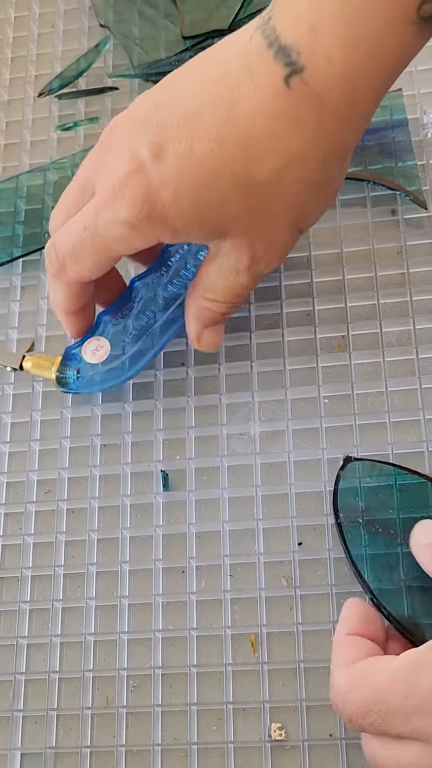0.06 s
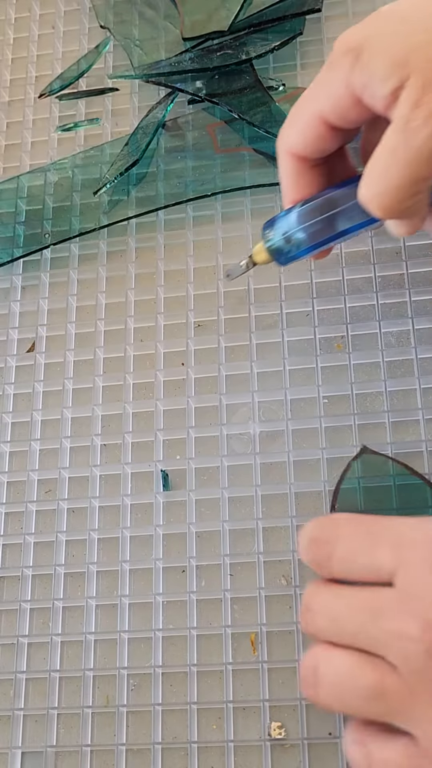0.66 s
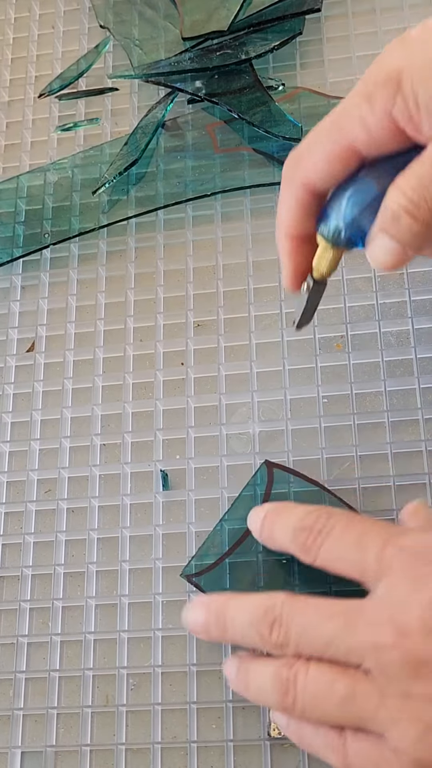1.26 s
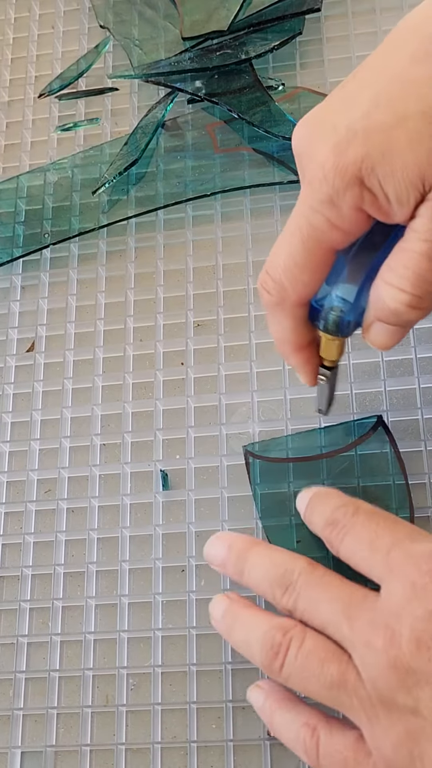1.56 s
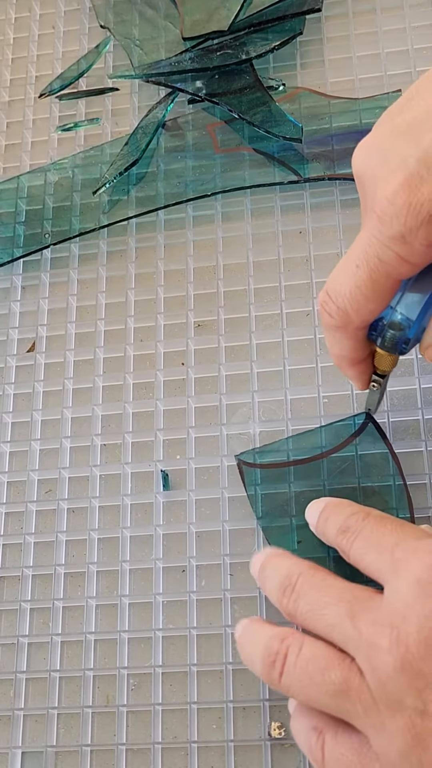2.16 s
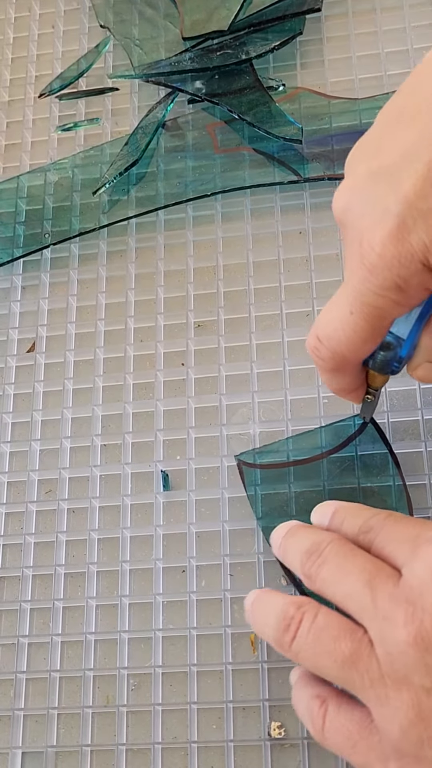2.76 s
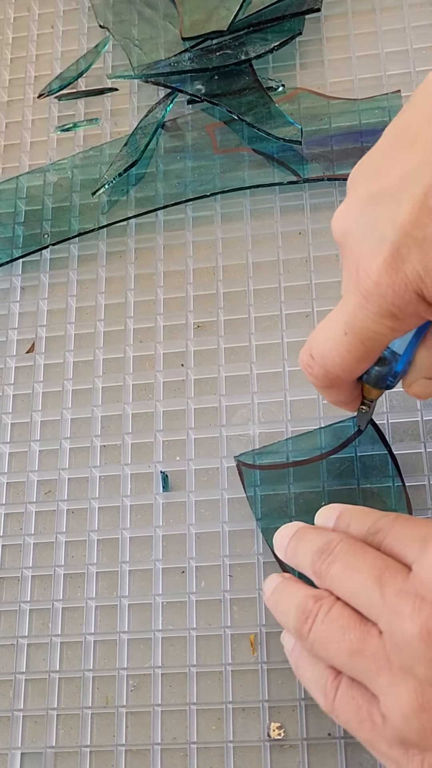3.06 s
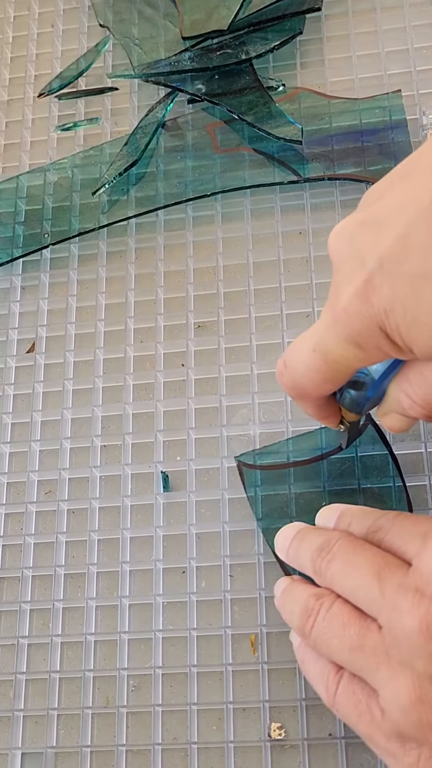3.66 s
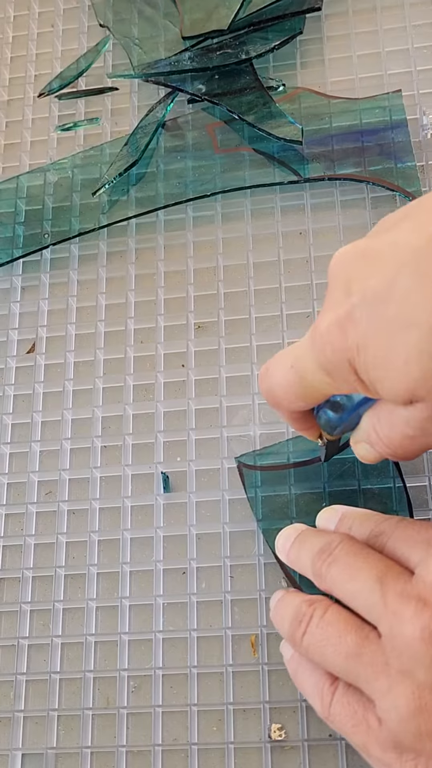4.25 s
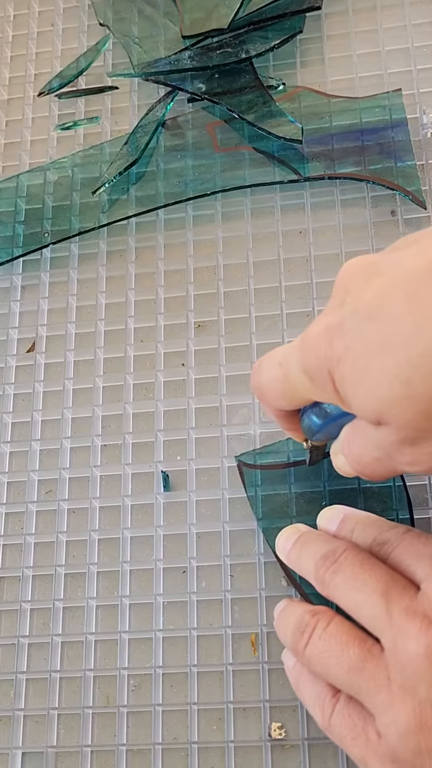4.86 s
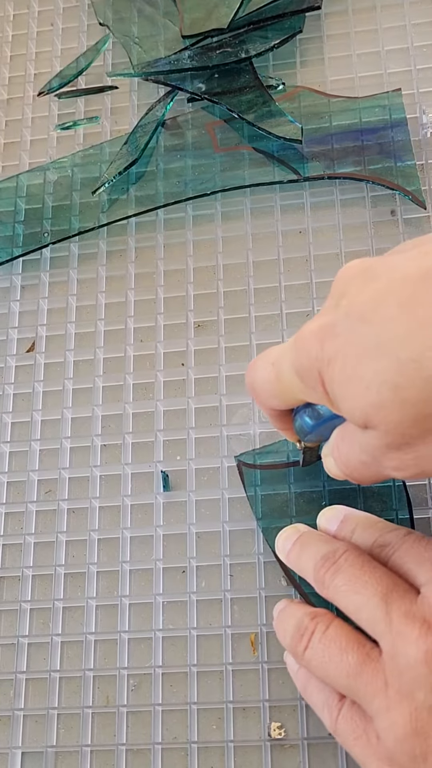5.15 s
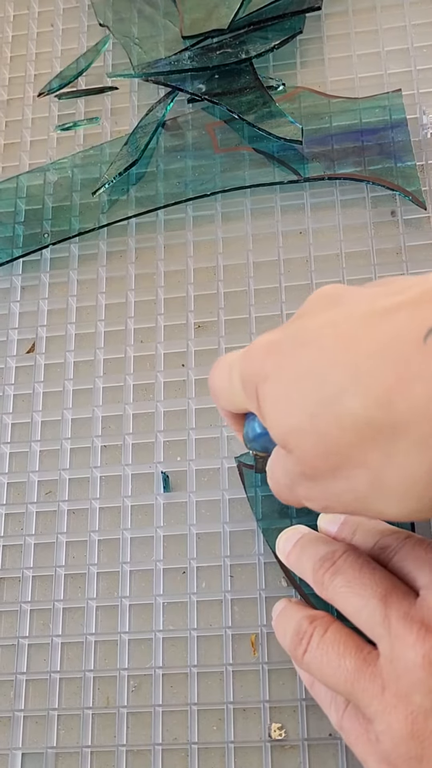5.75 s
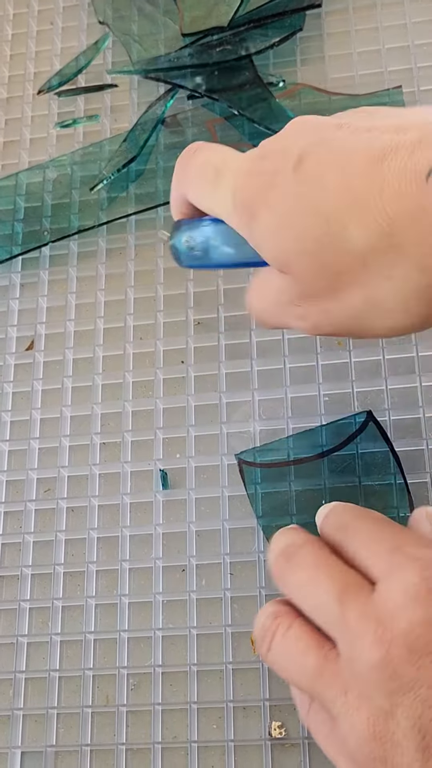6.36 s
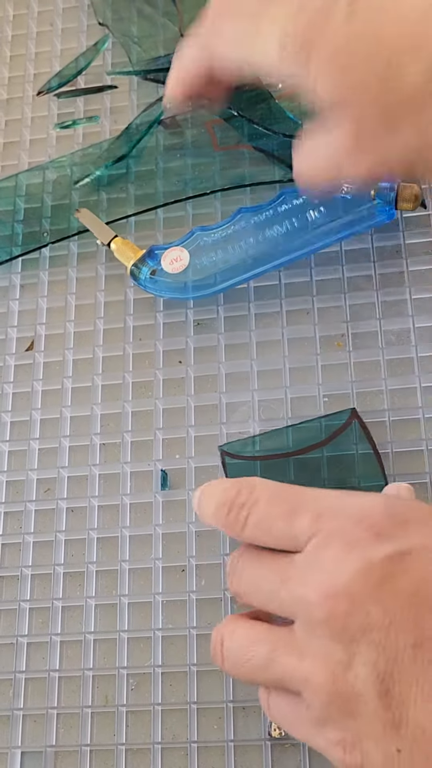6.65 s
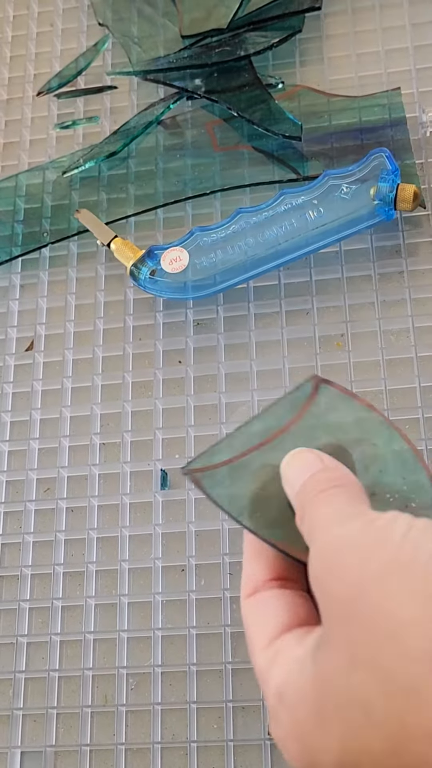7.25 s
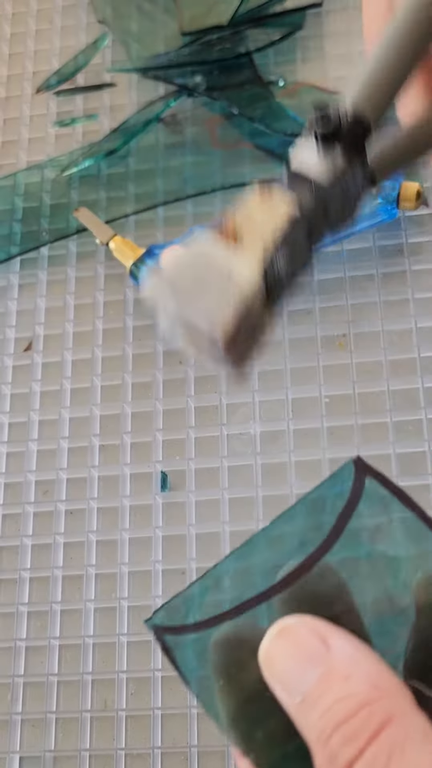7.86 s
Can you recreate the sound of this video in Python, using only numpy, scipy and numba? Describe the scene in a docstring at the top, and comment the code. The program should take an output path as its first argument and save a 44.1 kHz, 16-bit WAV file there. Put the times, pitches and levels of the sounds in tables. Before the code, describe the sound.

A soft rub and a sharp, clinking knock open the sound as a glass cutter is picked up. From about 0.6 to 1.5 seconds a piece of glass slides over a plastic grid with light, hollow clacks. The cutter wheel taps the glass at 2.4 seconds. From 3 seconds it scores the pane in uneven, gritty, high crackling bursts that grow stronger, pause around 4.5 seconds and resume just after 5. At about 6.1 seconds the wheel runs off the edge with a sharp click and a low thump. At 6.5 seconds the cutter drops on the plastic with the loudest clack, bouncing while its loose metal head rattles briefly. Softer knocks and rubbing follow from 7 to 7.5 seconds as the glass is lifted. Everything is close, in a small room with a faint electrical hum and occasional, very faint distant birds.

```python
"""A soft rub and a sharp, clinking knock sound over faint mains hum: a wheel cutter is picked up.
Sheet glass slides into place on a plastic grid on a bench, exciting its resonances; far birds call.
The wheel scores a curve by stick-slip motion, each slip a tiny fracture that rings the pane, then runs
off the edge and strikes the grid. The cutter is dropped, its loose head rattles, and the glass is
lifted. Early reflections and a short reverberation place it all in a small room."""
import sys
import numpy as np
from scipy import signal
from scipy.fft import rfft, irfft, next_fast_len
from scipy.io import wavfile
from scipy.ndimage import uniform_filter1d
from numba import njit

SR = 44100
rng = np.random.default_rng(int(sys.argv[2]) if len(sys.argv) > 2 else 0)


def unload_wav(signal):
    """Save mono or channel-first audio to the path in sys.argv[1] as 16-bit WAV at rate SR, clipped to [-1, 1]."""
    wavfile.write(
        sys.argv[1],
        SR,
        np.round(np.clip(np.atleast_2d(signal).T, -1, 1) * 32767).astype(np.int16),
    )


N = 357196
TIME = np.arange(N) / SR
PADDED = next_fast_len(N + SR, real=True)
FREQ = np.maximum(np.fft.rfftfreq(PADDED, 1 / SR), 1)


def undb(db):
    """Amplitude ratio of a level; the levels in the tables are relative."""
    return 10 ** (np.asarray(db) / 20)

def unit(x):
    """Normalisation to rms 1."""
    return x / np.sqrt(np.mean(x ** 2))

def curves(table):
    """Linear interpolation of each column over time."""
    s, *columns = np.transpose(table)
    return [np.interp(TIME, s, c) for c in columns]

def swell(s, rise_s, fall_s):
    """Asymmetric Gaussian envelope, peaking at time s."""
    return np.exp(-((TIME - s) / np.where(TIME < s, rise_s, fall_s)) ** 2)

def walk(rate):
    """Slow random modulation, turning rate times a second."""
    k = int(SR / rate)
    return 0.69 * uniform_filter1d(np.repeat(rng.standard_normal(N // k + 1), k), k)[:N]

def add(track, s, sound):
    """Superposition of a sound on a track at time s."""
    i = max(int(s * SR), 0)
    track[..., i:i + sound.shape[-1]] += sound[..., :N - i]

def pan(db):
    """Channel gains for a level difference, left minus right."""
    return undb(np.array([db, -db]).reshape(2, -1) / 2)

def contour(points, freq=FREQ):
    """Spectral envelope through points (f/Hz, level/dB)."""
    hz, db = np.transpose(points)
    return undb(np.interp(np.log(freq), np.log(hz), db))

def causal(gain):
    """Minimum-phase response: nothing sounds ahead of its excitation."""
    cepstrum = irfft(np.log(gain), PADDED)
    cepstrum[1:PADDED // 2] *= 2
    cepstrum[PADDED // 2 + 1:] = 0
    return np.exp(rfft(cepstrum))

def modes(table):
    """Modal superposition: the summed response of damped resonators."""
    return sum(undb(db) / (1 + 1j * (FREQ ** 2 - hz ** 2) / (FREQ * width)) for hz, width, db in table)

def through(x, response):
    """Linear filtering by multiplication of spectra."""
    return irfft(rfft(x, PADDED) * response, PADDED)[..., :N]

def ring(x, response):
    """Forced response, scaled to conserve the power of a white input."""
    return through(x, response / np.sqrt(np.mean(abs(response) ** 2)))

def noise(points, size=N, apart_hz=1300):
    """Coloured stereo noise whose coherence falls with frequency."""
    count = next_fast_len(size, real=True)
    freq = np.maximum(np.fft.rfftfreq(count, 1 / SR), 1)
    mid, side = rfft(rng.standard_normal((2, count)))
    side = side * np.clip(freq / apart_hz, .18, 1)
    spectrum = np.array([mid + side, mid - side]) * contour(points, freq)
    return unit(irfft(spectrum, count)[:, :size])

def radiate(x, turn_hz=330, spread=2.66, alike_hz=900):
    """Plate radiation: each frequency reaches left and right with its own phase difference."""
    knots = np.arange(0, SR / 2, turn_hz)
    phase = np.interp(FREQ, knots, spread * rng.standard_normal(len(knots))) * FREQ / (FREQ + alike_hz)
    return through(x, np.exp(.5j * np.array([phase, -phase])))

def bursts(table, grain_db, sag, release_s=.001, apart=.55):
    """Impulsive excitation: each row is a dense run of uneven micro-impacts that sags, then dies."""
    track, t = np.zeros((2, N)), np.arange(SR // 25) / SR
    for s, db, length in table:
        sizes = undb(grain_db * rng.standard_normal(len(t)))
        sides = 1 + apart * rng.standard_normal((2, len(t)))
        envelope = np.exp(-sag * t / length - np.maximum(t - length, 0) / release_s)
        burst = sides * rng.choice([-1, 1], len(t)) * sizes * envelope
        add(track, s, undb(db) * burst * np.sqrt(2 * length * SR / np.sum(burst ** 2)))
    return radiate(track)

def reverb(x, colour, t60_low, t60_high, delay_s):
    """Diffuse reverberation: echoes decay exponentially, the treble absorbed first."""
    t = np.arange(SR) / SR
    tail = noise(colour, size=len(t))
    low = signal.sosfilt(signal.butter(2, 2500, fs=SR, output="sos"), tail)
    high = signal.sosfilt(signal.butter(2, 2500, "high", fs=SR, output="sos"), tail)
    echo = (low * 1000 ** (-t / t60_low) - high * 1000 ** (-t / t60_high)) * (t > delay_s)
    return signal.fftconvolve(x, echo / np.sqrt(np.sum(echo ** 2) / 2), axes=1)[:, :N]


# spectrum of the room air: f/Hz, level/dB
AIR_SPECTRUM = [(20, -32), (50, -1), (90, -2.5), (140, -14), (220, -13), (400, -12.5), (650, -18),
                (1200, -25.5), (2200, -32.5), (3600, -36.5), (5000, -49), (7600, -40.5), (8800, -67.5),
                (16000, -63)]
# partials of the mains hum: f/Hz, level/dB
HUM_PARTIALS = [(58, -60.5), (118.6, -54), (237.5, -69.5), (1233, -73)]

def air_and_hum(air_db=-51, waver_db=2):
    """A line spectrum over a continuous one: mains hum and room air, both wavering slightly."""
    hum = sum(np.sqrt(2) * undb(db + 2 * walk(6.8)) * np.sin(2 * np.pi * hz * TIME + .5 * walk(3.6))
              for hz, db in HUM_PARTIALS)
    return noise(AIR_SPECTRUM) * undb(air_db + waver_db * walk(22)) + hum


# load of the leaning hand on the bench: t/s, level/dB
HAND_LOAD = [(0, -69), (2.9, -60.5), (3.4, -61.5), (4.2, -49.5), (4.9, -59.5), (5.5, -40), (5.8, -55.5),
             (6.4, -53.5), (7.12, -39.5), (7.4, -53.5), (8.1, -52.5)]

def bench_rumble(boom_s=6.085, boom_db=-23.5):
    """Forced vibration: the bench rumbles under the hand and booms as the wheel leaves the glass."""
    rumble = noise([(25, -15.5), (50, -3), (120, 0), (170, -4), (280, -15), (900, -39.5), (4000, -85.5)])
    boom = undb(boom_db) * swell(boom_s, rise_s=.014, fall_s=.05)
    return rumble * (undb(curves(HAND_LOAD)[0]) + boom)


# modes of the grid and bench: f/Hz, bandwidth/Hz, level/dB
GRID_MODES = [(144, 19, 1.5), (182, 5.9, -0.5), (260, 13, -15.5), (292.3, 7.2, 1.5), (432.4, 7.8, 1.5),
              (468, 7, -5), (630, 61, 4), (835, 22, -1.5), (890, 42, -4), (940, 16, -1.5), (1120, 33, -1),
              (1335, 29, -8), (2410, 58, -2.5)]
# modes of the cutter in the fingers: f/Hz, bandwidth/Hz, level/dB
CUTTER_MODES = [(4750, 74, 6.5), (6260, 120, 9), (8600, 42, 11), (10680, 43, -1), (11500, 70, -7.5),
                (13100, 70, -4), (13780, 80, -5), (14280, 90, -5.5)]
# glass and fingers sliding on the grid: peak t/s, rise/s, fall/s, rub level/dB, hiss level/dB
GRID_SLIDES = [(.08, 0.18, 0.18, -52, -64.5), (0.681, 0.098, 0.12, -53, -62.5),
               (.89, .11, 0.088, -41.5, -48.5), (1.45, 0.11, 0.064, -47.5, -48.5),
               (2.15, 0.021, 0.025, -52, -56.5), (2.7, 0.024, 0.053, -53.5, -65),
               (6.72, .1, 0.29, -47, -68), (7.2, 0.18, 0.32, -58, -66), (7.53, 0.053, 0.083, -54, -53.5)]

def sliding(catch_db=2.5, grit_db=3):
    """Sliding friction: noise coloured by resonances flutters as the glass catches on the ribs."""
    rub_gain, hiss_gain = sum(undb([[rub_db], [hiss_db]]) * swell(s, rise, fall)
                              for s, rise, fall, rub_db, hiss_db in GRID_SLIDES)
    rub = noise([(60, -13), (170, -2), (400, 6.5), (800, -7), (1800, -11.5), (3500, -25.5), (8000, -50)])
    rub = unit(through(rub, 1 + modes(GRID_MODES)))
    hiss = noise([(800, -33.5), (2800, 3.5), (5000, -.5), (6400, -1.5), (8500, -6.5),
                  (11000, -13.5), (14000, -11.5), (16000, -14.5)])
    hiss = unit(through(hiss, 1 + modes(CUTTER_MODES)))
    catch, grit = undb(catch_db * walk(70)), undb(grit_db * walk(600))
    return catch * (rub * rub_gain + hiss * hiss_gain * grit)

def rib_bumps(gap_s=.06, t60_s=.06, scatter_db=2):
    """Roughness excitation: glass bumps over the ribs, hardest where fastest; gives rows of impacts."""
    rows = []
    for s, rise, fall, rub_db, _ in GRID_SLIDES:
        chance = zip(rng.random(size=16), rng.standard_normal(size=16))
        for rib, (late, strength) in zip(np.arange(-rise, fall, gap_s), chance):
            offset = rib + late * gap_s
            drop_db = 20 / np.log(10) * (offset / (rise if offset < 0 else fall)) ** 2
            db = rub_db + scatter_db * strength - drop_db
            if s + offset > 0:
                rows.append((s + offset, db + .5, db - 4, db - 17.5, t60_s, 0))
    return rows


# cutter and glass hitting the grid: t/s, thud level/dB, clack level/dB, tick level/dB, T60/s, pan/dB
IMPACTS = [(.028, -41, -42, -58.5, 0.029, -0.5), (0.1513, -18, -15, -20, .019, -3),
           (.615, -47, -40, -51, 0.12, 0), (.76, -54, -37.5, -62, 0.075, 0),
           (0.7992, -39.5, -33.5, -47, 0.14, .5), (.849, -33.5, -30, -36, 0.072, 0.5),
           (.955, -37.5, -51, -67, 0.14, -2), (1.025, -39.5, -41, -56, 0.055, 2),
           (1.291, -35.5, -39, -62, 0.069, 0), (1.455, -56, -41.5, -50, 0.059, -3),
           (2.086, -50, -58.5, -75, 0.023, 1), (2.378, -40, -39, -41, 0.018, 2.5),
           (2.724, -38, -38.5, -61, 0.02, 1.5), (6.066, -24.5, -16.5, -18.5, 0.077, -2),
           (6.415, -68.5, -60, -50, 0.022, 1), (6.5424, -18, -15.5, -25.5, 0.043, -1),
           (6.995, -32, -36.5, -44, 0.07, -2), (7.074, -35.5, -65, -57, 0.029, 1),
           (7.134, -31, -39, -41.5, 0.12, 1), (7.31, -52.5, -62.5, -49, 0.26, -3)]
# spectrum of an impact: f/Hz, level/dB
IMPACT_SPECTRUM = [(35, 4), (70, 7), (130, 1.5), (400, 2), (650, -1.5), (1200, 0), (1800, -2.5),
                   (2500, -4.5), (4500, -3), (7500, -5), (9500, -18), (11500, -27.5), (13500, -23),
                   (16000, -29)]

def knocks(gain_db=-1, thud_hz=480, tick_hz=3100, thud_stretch=1.4):
    """Free decay after impact: the bench thuds, the plastic clacks and ticks, the grid rings briefly."""
    track, t = np.zeros((2, N)), np.arange(SR // 4) / SR
    edges = [([105, thud_hz], "band"), ([thud_hz, tick_hz], "band"), (tick_hz, "high")]
    low, mid, high = [signal.butter(3, edge, kind, fs=SR, output="sos") for edge, kind in edges]
    for s, thud_db, clack_db, tick_db, t60, pan_db in IMPACTS + rebounds() + rib_bumps():
        dense_modes = noise(IMPACT_SPECTRUM, size=len(t))
        for band, db, decay_s, side in [(low, thud_db, t60 * thud_stretch, 0),
                                        (mid, clack_db, t60, pan_db), (high, tick_db, t60, pan_db)]:
            part = signal.sosfilt(band, dense_modes * 1000 ** (-t / decay_s))
            add(track, s, pan(side) * undb(db) * part / np.std(part[:, :SR // 100]))
    return undb(gain_db) * through(track, 1 + modes(GRID_MODES))


# the cutter bouncing after a hard knock:
# t/s, first flight/s, duration/s, thud level/dB, clack level/dB, tick level/dB, fade/(dB/s), T60/s
CUTTER_BOUNCES = [(0.149, .031, .048, -29.5, -23, -23.5, 89.5, 0.064),
                  (6.065, .015, .034, -22.5, -20.5, -20.5, 201.5, 0.057),
                  (6.5421, .035, .125, -17.5, -15, -14.5, 111.5, .075)]

def rebounds(restitution=.87, far_share=.42, far_db=-2.5, far_pan_db=5.5):
    """Inelastic collision: the cutter rocks end to end in shrinking hops; gives rows of impacts."""
    rows = []
    for start, flight, length, thud, clack, tick, fade, t60 in CUTTER_BOUNCES:
        hop = 0
        for _ in range(8):
            far_end, near_end = (hop + far_share * flight, far_db, far_pan_db), (hop + flight, 0, 0)
            for late, end_db, side in (far_end, near_end):
                db = end_db - fade * late
                if late < length:
                    rows.append((start + late, thud + db, clack + db, tick + db, t60, side))
            hop, flight = hop + flight, flight * restitution
    return rows


# contacts of the cutter as it is picked up: t/s, level/dB, duration/s
PICKUP_CONTACTS = [(.1525, -21, 0.0018), (.183, -27.5, 0.0024), (.853, -41.5, 0.00866)]

def cutter_clinks():
    """Modal ringing: brief contacts excite the cutter held in the fingers."""
    return ring(bursts(PICKUP_CONTACTS, grain_db=9, sag=.32), modes(CUTTER_MODES))


# glass or handle landing flat on the grid: t/s, level/dB, duration/s
FLAT_CONTACTS = [(.736, -36.5, 0.0037), (.761, -40, .011), (.8, -37, .0031), (.85, -27, 0.0055),
                 (1.291, -45, 0.0044), (6.5435, -9.5, .0014), (6.9955, -22, 0.0021)]
# air modes of the covered grid cells: f/Hz, bandwidth/Hz, level/dB
CELL_MODES = [(1140, 150, 9), (1440, 170, 7.5), (1760, 130, 0.5), (2400, 200, -2)]

def hollow_slaps(pan_db=3):
    """Cavity resonance: a flat face claps on the air cells of the grid."""
    return pan(pan_db) * ring(bursts(FLAT_CONTACTS, grain_db=-.5, sag=.82), modes(CELL_MODES))


# notes of each song: t/s within it, duration/s, start f/Hz, end f/Hz, level/dB, relative warble
HOARSE_NOTES = [(0, .08, 5460, 4420, -5, 0.087), (0.028, .12, 3013, 2670, 0.5, 0.09),
                (0.087, .18, 3230, 2940, -4.5, .08), (.172, .16, 2405, 2095, -4.5, 0.081)]
THIN_NOTES = [(0, .053, 6950, 5830, -1, .036), (.07, .045, 6580, 6350, -9, .014),
              (.15, .03, 4420, 4350, -1.5, .008), (.21, .065, 5930, 5340, -14.5, .045)]
# entries of each song: t/s, level/dB
HOARSE_ENTRIES = [(.866, -53.5), (1.216, -55.5), (1.592, -55)]
THIN_ENTRIES = [(3.068, -51.5), (5.765, -50.5), (7.446, -52)]

def birds(direct_db=-14):
    """Frequency modulation: two far birds whistle falling, warbling notes, heard mostly as echoes."""
    song = np.zeros((2, N))
    for entries, notes in [(HOARSE_ENTRIES, HOARSE_NOTES), (THIN_ENTRIES, THIN_NOTES)]:
        for s, song_db in entries:
            for late, length, start_hz, end_hz, db, warble in notes:
                u = np.linspace(0, 1, int(length * SR))
                hz = (start_hz + (end_hz - start_hz) * u) * (1 + warble * walk(350)[:len(u)])
                envelope = undb(song_db + db) * np.sqrt(8 * u * (1 - u))
                add(song, s + late, envelope * np.sin(2 * np.pi * np.cumsum(hz) / SR))
    echoes = reverb(song, [(100, .035), (8000, .011)], t60_low=.77, t60_high=.33, delay_s=.0078)
    return undb(direct_db) * song + echoes


# the wheel set down on the glass: t/s, level/dB, duration/s
WHEEL_CONTACT = [(2.378, -24, .0016)]
# modes of the free glass: f/Hz, bandwidth/Hz, level/dB
FREE_GLASS_MODES = [(2320, 160, -13), (4220, 350, -2), (5066, 150, 7.5), (5330, 220, -13), (7120, 350, 4.5),
                    (8630, 170, -2), (11400, 300, -35), (14000, 300, -22)]

def wheel_tap():
    """Impulse response of a plate: one touch of the wheel rings the glass."""
    return ring(bursts(WHEEL_CONTACT, grain_db=10, sag=.91, release_s=.00083), modes(FREE_GLASS_MODES))


# pushes of the hand, the last crushing the edge:
# first t/s, last t/s, level/dB, slip rate/Hz, slip duration/s
HAND_PUSHES = [(2.951, 3.044, -37.5, 105, .0042), (3.1885, 3.263, -35.5, 105, .004),
               (3.4397, 3.4397, -33, 60, .004), (3.4663, 3.5393, -32, 70, .005),
               (3.5746, 3.6004, -30.5, 40, .0046), (3.654, 3.654, -31, 60, .0046),
               (3.7399, 3.8486, -31, 62, .0046), (4.0108, 4.0108, -34, 60, .004),
               (4.0512, 4.0842, -28, 70, .0033), (4.1083, 4.1206, -28, 80, .0035),
               (4.1446, 4.1963, -26.5, 60, .004), (4.3289, 4.44, -27, 135, .006),
               (5.1156, 5.1248, -28, 105, .0034), (5.1516, 5.2906, -28, 105, .006),
               (5.3252, 5.38, -28.5, 40, .008), (5.4144, 5.467, -28, 60, .006),
               (5.487, 5.5944, -26, 105, .006), (5.6327, 5.6571, -26, 90, .0047),
               (5.8219, 5.8219, -31, 60, .004), (5.931, 5.931, -45, 60, .003),
               (5.9462, 6.054, -26, 135, .0062), (6.0655, 6.08, -16, 130, .0055)]

def stick_slip(jitter=.14, scatter_db=1.66, build_db=1, length_spread=.12):
    """Stick-slip motion: the wheel advances in loosely periodic bursts, harder as pressure builds."""
    slips = []
    for first, last, db, rate, length in HAND_PUSHES:
        count = 1 + round((last - first) * rate)
        timing, strength, stretch = rng.standard_normal((3, 64))[:, :count]
        times = np.linspace(first, last, count)
        times[1:-1] += jitter / rate * timing[:-2]
        pressure_db = build_db * (times - times.mean()) / (last - first + 1 / rate)
        levels = db + pressure_db + scatter_db * strength
        slips += zip(times, levels, length * np.exp(length_spread * stretch))
    return bursts(slips, grain_db=5, sag=.88)

def pane_ripple(spacing_hz=170, ripple_db=3):
    """Modal overlap: the pane's many weak modes leave an uneven ripple on the spectrum."""
    knots = np.arange(0, SR / 2, spacing_hz)
    return undb(ripple_db * np.interp(FREQ, knots, rng.standard_normal(len(knots))))

@njit
def moving_mode(x, hz, width):
    """A damped resonator of varying natural frequency, with gain 1 at resonance."""
    y, band_state, low_state = np.empty(len(x)), 0., 0.
    for i in range(len(x)):
        g, damping = np.tan(np.pi * hz[i] / SR), width / hz[i]
        band = (band_state + g * (x[i] - low_state)) / (1 + g * (g + damping))
        band_state, low_state = 2 * band - band_state, low_state + 2 * g * band
        y[i] = damping * band
    return y

# course of the cut: t/s, head f/Hz, head level/dB, brittle level/dB, pan/dB
CUT_COURSE = [(2.95, 4830, 4, 9, 0), (3.26, 4800, 4, 8, 0), (3.45, 5350, 9, 8.5, 2.5),
              (3.85, 5950, 15, -7, 2), (4.05, 6250, 16.5, 1, 3.5), (4.45, 6460, 8.5, -1.5, 1),
              (5.12, 6380, 11, -6, 0), (5.43, 6000, 13, 4, 0.5), (5.49, 5400, 9.5, -13, -1),
              (5.65, 5760, 1, 0.5, -2), (5.95, 6000, 0, 3, -2.5), (6.06, 6140, 8, 7.5, 3)]
# spectrum of a fracture: f/Hz, level/dB
FRACTURE_SPECTRUM = [(200, -8), (800, -4.5), (1600, -6.5), (2400, -6.5), (4000, 2), (6000, -5), (8200, 1.5),
                     (10100, -8.5), (11050, -15.5), (11700, -12.5), (15300, -12.5), (16100, -31)]
# modes of the glass and cutter pressed together: f/Hz, bandwidth/Hz, level/dB
PRESSED_MODES = [(2340, 170, 11), (4250, 190, -15.5), (5447, 310, -2), (6000, 87, -6), (6500, 42, -8),
                 (8250, 410, -6.5), (9500, 130, -11.5), (13570, 450, 9.5), (15100, 600, 3.5)]
# high modes, strongest with the wheel near an edge: f/Hz, bandwidth/Hz, level/dB
BRITTLE_MODES = [(9700, 700, 3), (12270, 790, 2.5), (15200, 600, -5)]
# directivity of the pane: f/Hz, left minus right level/dB
PANE_DIRECTIVITY = [(700, -2.5), (2380, 5), (4400, -0.5), (8100, -4.5), (15000, -2.5)]

def scoring(gain_db=-5, head_width_hz=380., head_db=-1):
    """Brittle fracture: cracks ring the glass; the head's resonance shifts as the grip turns."""
    head_hz, ring_db, brittle_db, pan_db = curves(CUT_COURSE)
    slips = stick_slip()
    response = causal(contour(FRACTURE_SPECTRUM) * pane_ripple()) * (1 + modes(PRESSED_MODES))
    cracks = ring(slips, response)
    head = undb(ring_db + head_db) * np.array([moving_mode(c, head_hz, head_width_hz) for c in cracks])
    brittle = (undb(brittle_db) - 1) * through(cracks, modes(BRITTLE_MODES))
    sound = undb(gain_db) * pan(pan_db) * (cracks + head + brittle)
    return through(sound, contour(PANE_DIRECTIVITY) ** np.array([[.5], [-.5]]))


# the loose steel head striking its socket: t/s, level/dB, duration/s
SOCKET_CONTACTS = [(6.55, -20, .009), (6.578, -17, .008), (6.607, -15, .011), (6.622, -10.5, .013),
                   (6.642, -18, 0.0088), (6.651, -13, .008), (6.677, -22, 0.0091)]
# damped modes of the head: f/Hz, bandwidth/Hz, level/dB
HEAD_MODES = [(5240, 160, -11), (6425, 130, -7.5), (6670, 31, -2.5), (7717, 40, 4), (8310, 22, 9.5),
              (8608, 40, -14.5), (10330, 40, -10), (12540, 80, -14), (13510, 60, -20), (14940, 140, -16.5)]

def head_rattle(clatter_db=-21, pan_db=-4):
    """Contact chatter: the swivel head of the dropped cutter buzzes in its socket."""
    spectrum = contour([(500, -22.5), (3000, -7), (6000, -3), (9000, -2.5), (15500, -5.5), (16200, -21)])
    response = modes(HEAD_MODES) + undb(clatter_db) * causal(spectrum)
    return pan(pan_db) * ring(bursts(SOCKET_CONTACTS, grain_db=3, sag=.19), response)


def scene(room_db=-12, bench_db=-13):
    """Superposition of direct sound, early reflections off the bench and a short room tail."""
    direct = (bench_rumble() + sliding() + knocks() + cutter_clinks() + hollow_slaps()
              + wheel_tap() + scoring() + head_rattle())
    bench_colour = [(100, -13.5), (1000, 12.5), (16000, -13)]
    room_colour = [(80, 3), (400, 4), (1500, 1.5), (6000, 0), (10000, -1.5), (16000, -2.5)]
    early = reverb(direct, bench_colour, t60_low=.073, t60_high=.036, delay_s=.0016)
    tail = reverb(direct, room_colour, t60_low=.33, t60_high=.23, delay_s=.0086)
    return air_and_hum() + direct + undb(bench_db) * early + undb(room_db) * tail + birds()

def record(dry, top_hz=16100):
    """Hard clipping at full scale, then band limiting."""
    return signal.sosfilt(signal.ellip(10, .2, 80, top_hz, fs=SR, output="sos"), np.clip(dry, -1, 1))


dry = scene()
out = record(dry)
unload_wav(out)
```